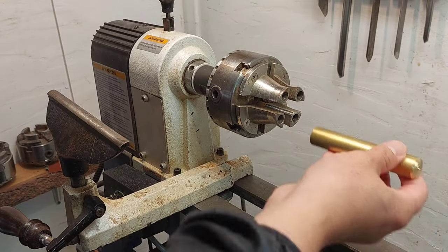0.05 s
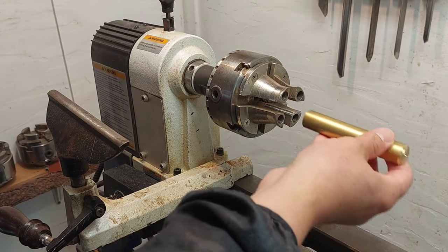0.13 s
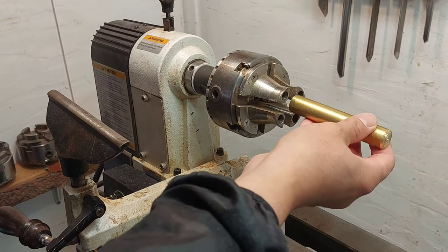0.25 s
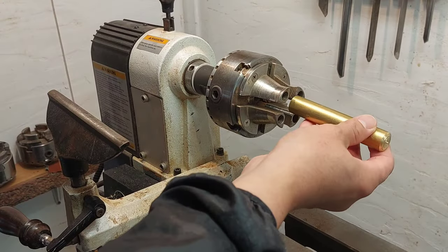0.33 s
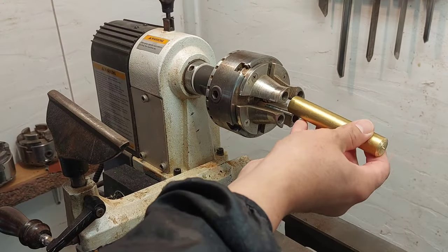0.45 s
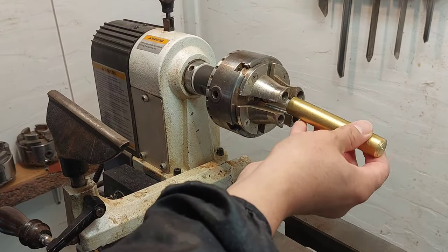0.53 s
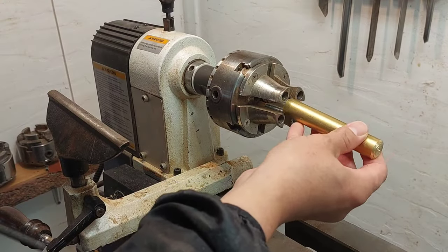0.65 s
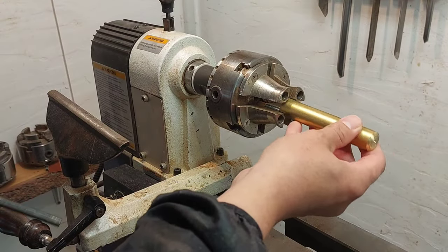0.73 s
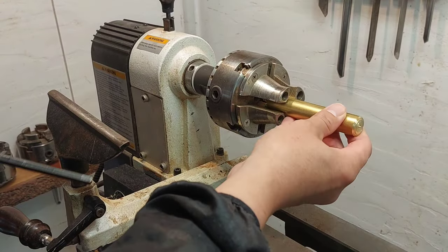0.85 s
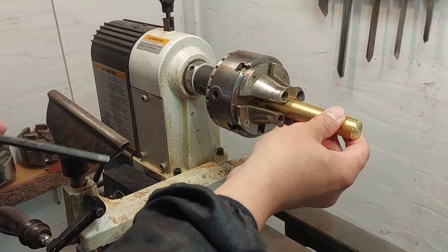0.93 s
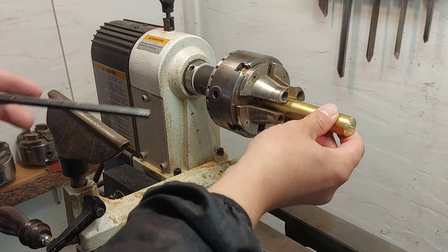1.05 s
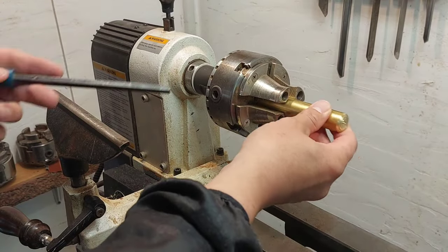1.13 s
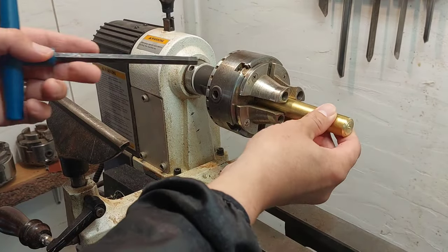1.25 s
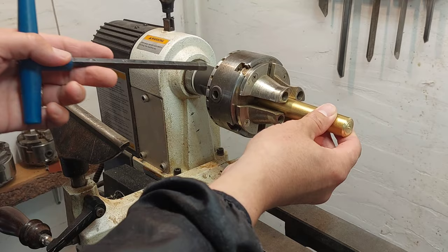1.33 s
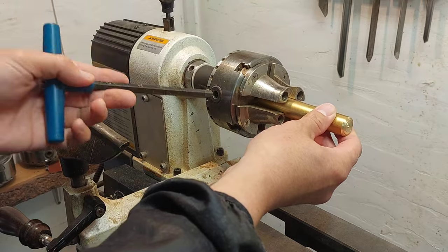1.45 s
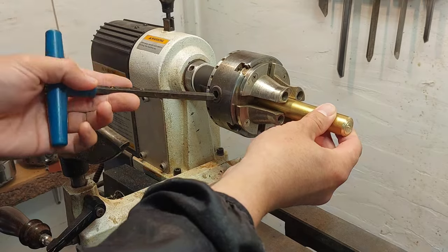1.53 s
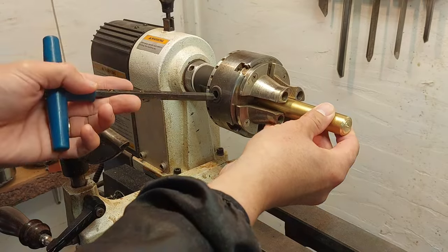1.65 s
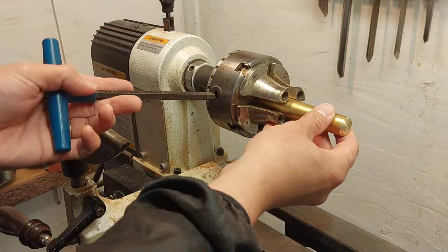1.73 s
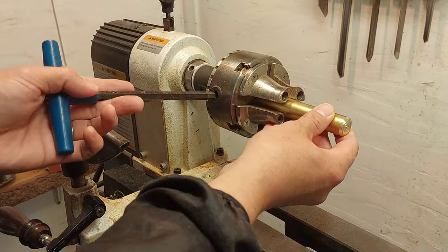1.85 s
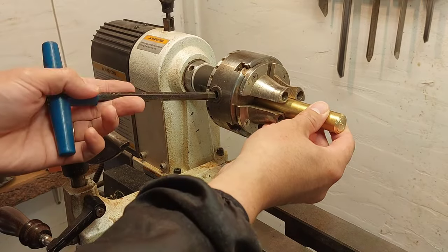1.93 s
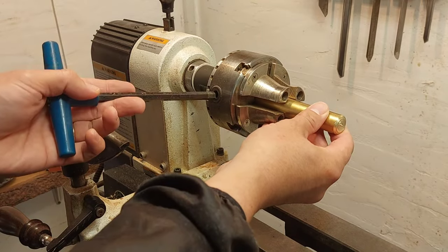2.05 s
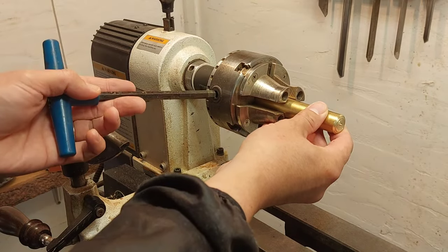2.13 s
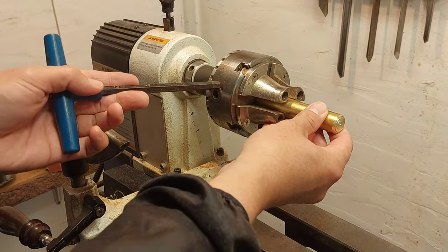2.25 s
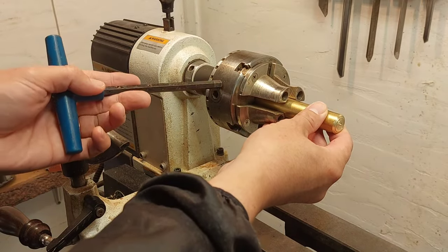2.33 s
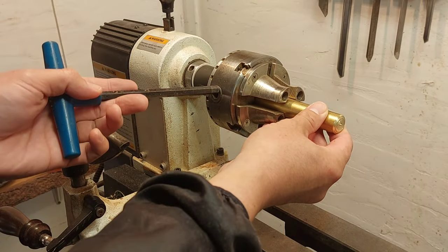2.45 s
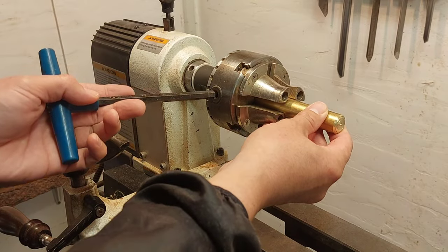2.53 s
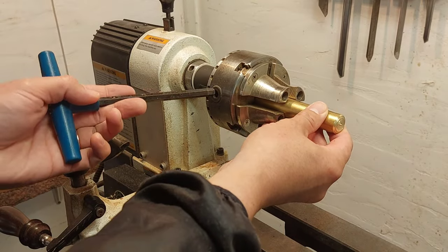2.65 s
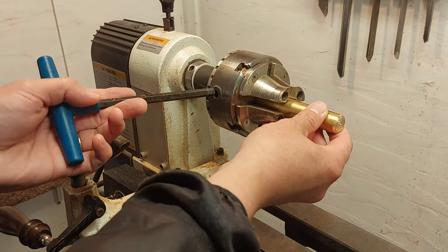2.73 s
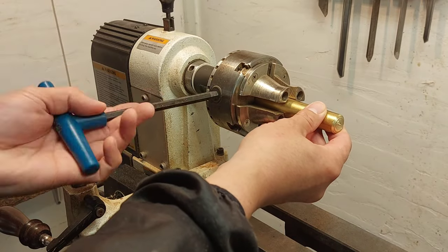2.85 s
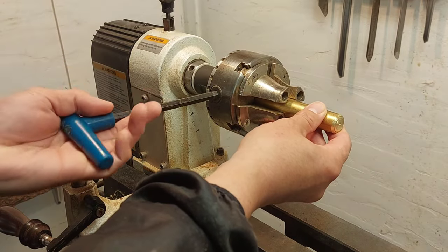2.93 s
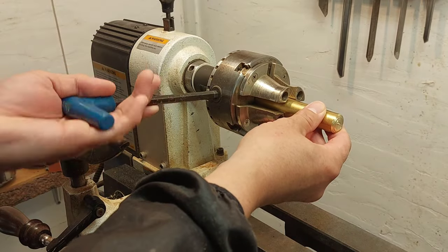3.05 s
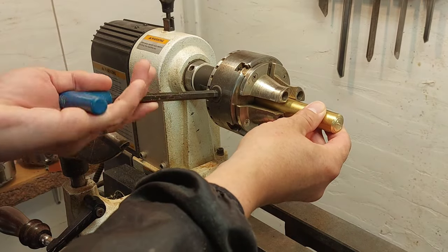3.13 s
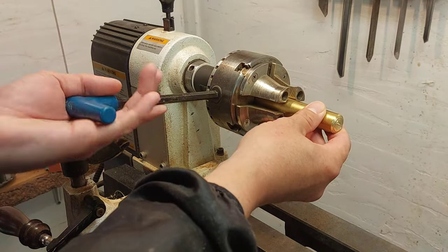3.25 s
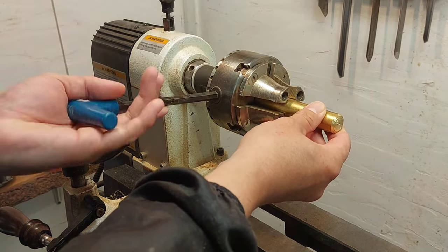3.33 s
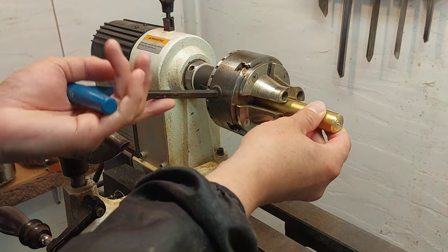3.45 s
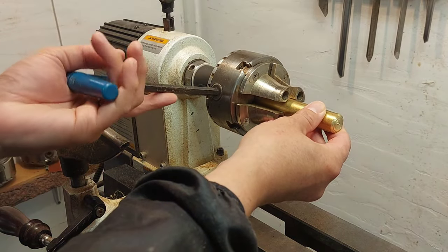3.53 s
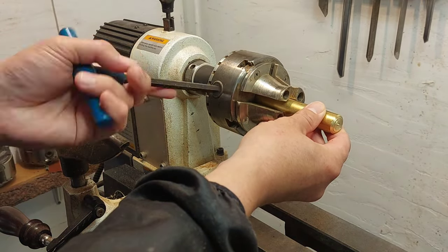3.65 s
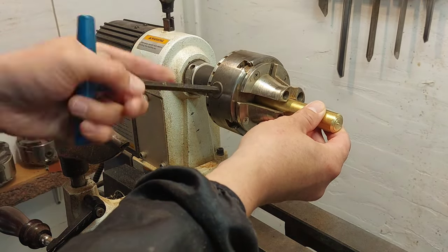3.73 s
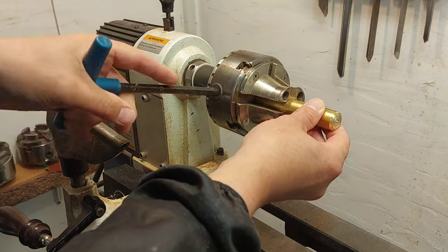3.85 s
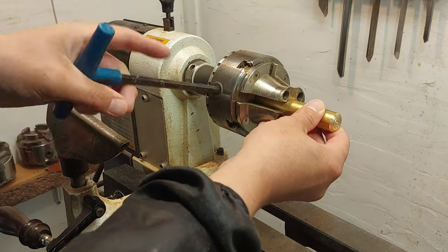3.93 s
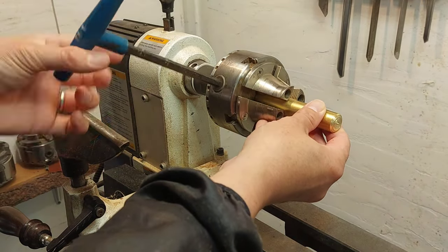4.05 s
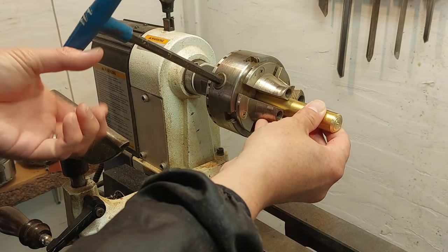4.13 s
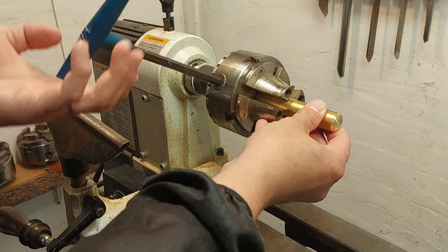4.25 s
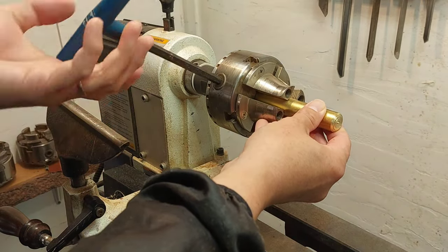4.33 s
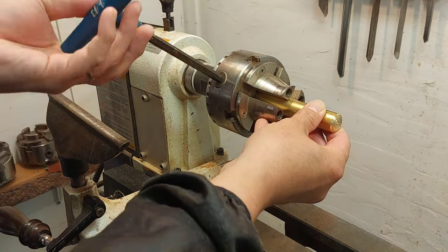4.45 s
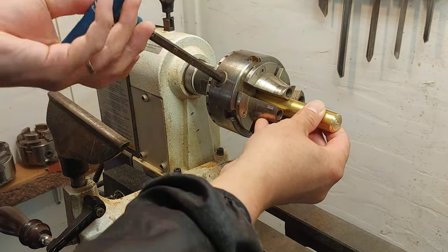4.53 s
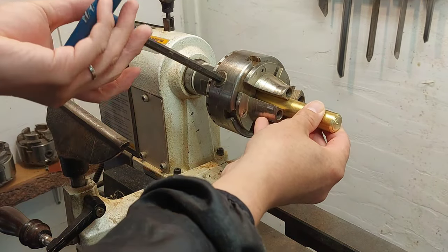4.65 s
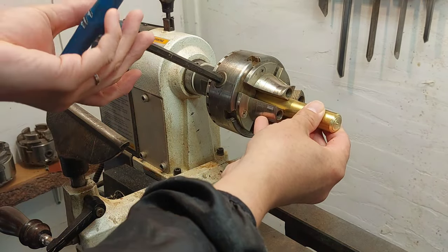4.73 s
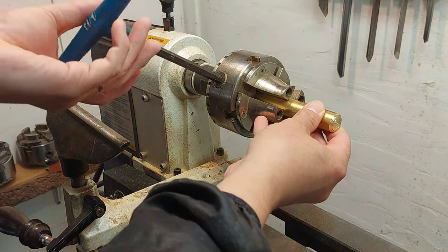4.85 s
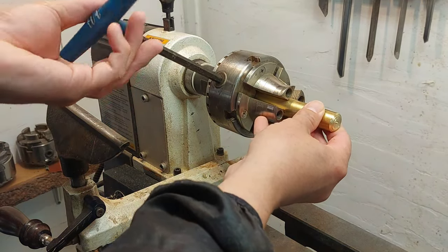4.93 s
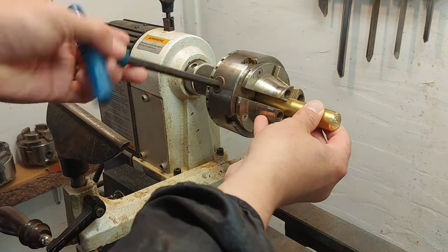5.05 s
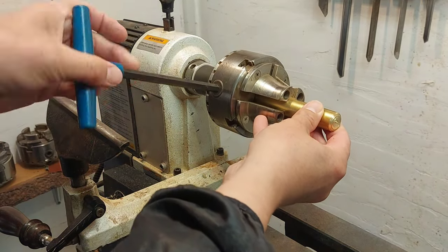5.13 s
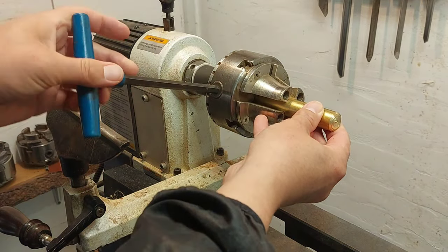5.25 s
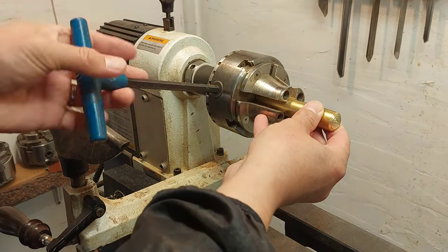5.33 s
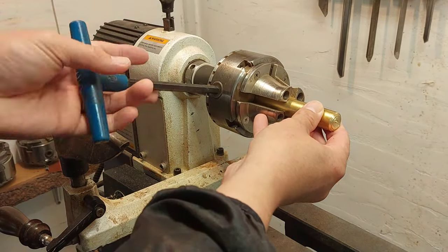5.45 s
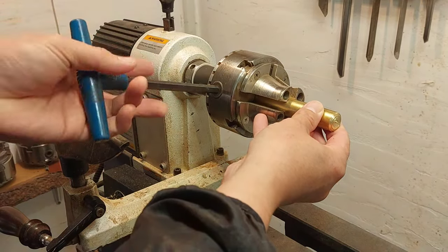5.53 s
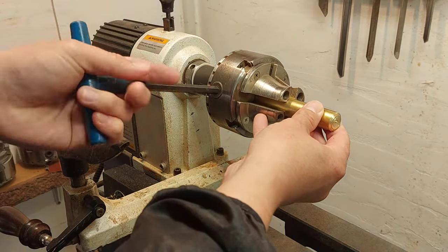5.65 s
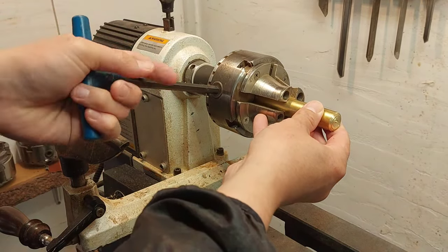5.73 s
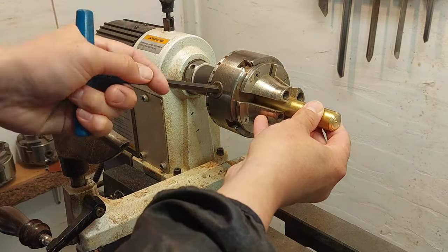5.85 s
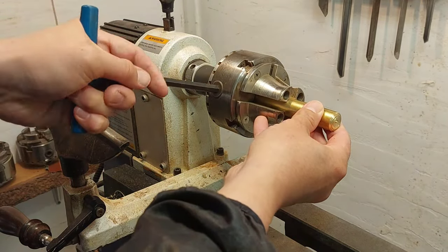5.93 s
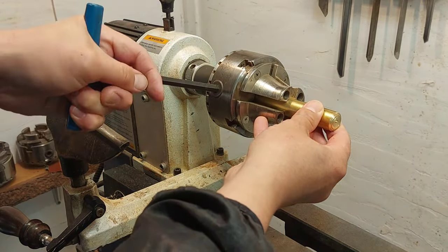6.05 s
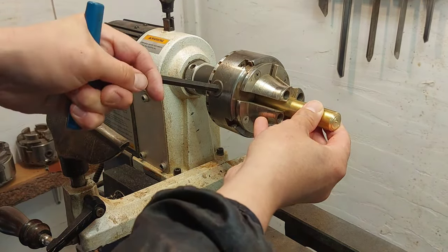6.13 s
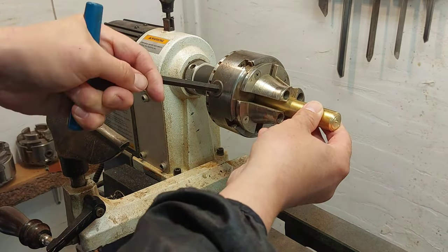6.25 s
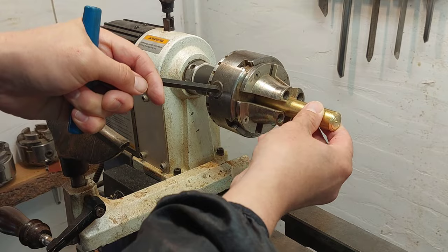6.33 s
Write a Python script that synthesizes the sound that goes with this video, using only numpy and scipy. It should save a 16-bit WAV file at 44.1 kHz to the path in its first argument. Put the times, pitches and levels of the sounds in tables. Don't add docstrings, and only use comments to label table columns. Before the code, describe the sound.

Close up in a small hard-walled workshop, a nylon sleeve swishes as a brass bar knocks on steel jaws, clanks loudly, scrapes and seats with a bright short ring. More scraping knocks follow, then a key clicks into its socket. After a near-quiet pause it drops with a very sharp double snap, then ticks and bounces lightly among soft cloth and skin rubs.

```python
import sys
import numpy as np
from scipy import signal
from scipy.fft import rfft, irfft, next_fast_len
from scipy.io import wavfile
from scipy.ndimage import uniform_filter1d, map_coordinates

SR = 44100
rng = np.random.default_rng(int(sys.argv[2]) if len(sys.argv) > 2 else 0)


def boost(x):
    u = np.asarray(x, float) / 20
    return 10 ** u


def to_wav(sig):
    pcm = np.clip(np.atleast_2d(sig), -1, 1) * 32767
    pcm = np.round(pcm).astype(np.int16)
    wavfile.write(sys.argv[1], SR, pcm.T)


N = 281604
TOP_HZ = 15650


def unit(x):
    return x / np.sqrt(np.mean(x ** 2) + 1e-20)


def along(points, hz):
    f, v = np.transpose(points)
    return np.interp(np.log(hz + 1), np.log(f + 1), v)


def wobble(rate):
    knots = rng.standard_normal(int(N * rate / SR) + 4)
    return map_coordinates(knots, [np.arange(N) * rate / SR])


def filtered(x, response):
    m = next_fast_len(x.shape[-1] + 8192)
    spectrum = rfft(x, m) * response(np.fft.rfftfreq(m, 1 / SR))
    return irfft(spectrum, m)[..., :x.shape[-1]]


def peaks(modes):
    def response(f):
        total = 0
        for k, (c, w, db) in enumerate(modes):
            total = total + (-1) ** k * boost(db) * 1j * f * w / (c * c - f * f + 1j * f * w)
        return total
    return response


def colour(spectrum):
    def gain(hz):
        return unit(boost(along(spectrum, hz)) * np.minimum(1, hz / spectrum[0][0]) ** 2)
    return gain


def swells(rows, column_order, sharper):
    edge_db = 14
    t, power = np.arange(0, N + 64, 64) / SR, 1e-14
    for row in rows:
        u = (t - row[0]) / np.where(t < row[0], abs(row[1]), abs(row[2]))
        power = power + boost(2 * (row[column_order] - sharper * edge_db * u ** 2))
    return np.interp(np.arange(N) / SR, t, np.sqrt(power))


# [pitch_hz, likeness (1 = same)]
NOISE_ALIKE = [(60, 1), (180, 0.64), (550, 0.64), (1650, -0.26), (4970, 0.16), (15000, -0.16)]
# [pitch_hz, left_over_right_db]
NOISE_LEAN = [(60, 7), (180, 7), (550, 3.5), (1650, 3.5), (4970, 5.5), (15000, 2.0)]


def rush(gain, patchy_db):
    z = signal.stft(rng.standard_normal((2, N + 512)), nperseg=512)[2]
    field = uniform_filter1d(rng.standard_normal(z.shape[1:]), size=6, axis=0)
    field = uniform_filter1d(field, size=8, axis=1)
    pair = signal.istft(z * boost(patchy_db * unit(field)), nperseg=512)[1][:, :N]

    def spread(hz):
        turn = np.arccos(np.clip(along(NOISE_ALIKE, hz), -1, 1)) / 2
        return gain(hz) * np.array([np.cos(turn), np.sin(turn)])

    def lean(hz):
        return boost(np.outer([.5, -.5], along(NOISE_LEAN, hz)))

    mid, side = filtered(pair, spread)
    return unit(filtered(np.array([mid + side, mid - side]), lean))


# [pitch_hz, time_to_fall_60db_s]
WALL_DECAY = [(200, 0.67), (1000, 0.3), (5000, 0.19), (14000, 0.16)]
# [pitch_hz, likeness (1 = same)]
WALL_ALIKE = [(300, 1), (800, 0.33), (2000, 0.036)]


def tail(length):
    hz, t, z = signal.stft(rng.standard_normal((2, length)), SR, nperseg=256)
    share = np.clip(along(WALL_ALIKE, hz), 0, 1)[:, None]
    z[1] = share * z[0] + np.sqrt(1 - share ** 2) * z[1]
    fade = boost(-60 * t / along(WALL_DECAY, hz)[:, None])
    pair = signal.istft(z * fade, SR, nperseg=256)[1]
    pair = pair / np.linalg.norm(pair[0])
    return np.pad(pair, ((0, 0), (130, 0))) * boost([[1.5], [-1.5]])


def ring(modes, t, attack, rough):
    luck = rng.normal(size=len(modes))
    drift = rough * np.cumsum(rng.standard_normal((len(modes), len(t))), axis=1) / np.sqrt(SR)
    total = 0
    for (hz, db, t60), u, d in zip(modes, luck, drift):
        fade = np.exp(-np.log(1000) * t / t60)
        total = total + boost(db + 0.84 * u) * fade * np.sin(np.float32(2 * np.pi * hz * t + d))
    return total * (1 - np.exp(-t / attack))


def pings(rows, loose, wet_db, pan_db):
    out, t = np.zeros((2, N + SR)), np.arange(SR // 6) / SR
    for s, db, hz, t60 in rows:
        tone = ring([(hz, db, abs(t60))], t, attack=.0006, rough=loose)
        heard = boost(wet_db) * signal.fftconvolve(tone[None], tail(SR // 6), axes=1)
        heard[:, :len(t)] += tone * boost([[pan_db / 2], [-pan_db / 2]])
        out[:, round(s * SR):][:, :heard.shape[1]] += heard
    return out[:, :N]


# [pitch_hz, time_to_fall_60db_s]
FRAME = [(125, .2), (216, .2), (258, .24), (293, .16), (432, .36), (448, .22), (488, .11), (533, .12),
         (590, .1), (628, .12), (747, .18), (900, .12)]
SPOTS = {"tip": [-9, -5.5, 0.5, -15, -39.5, -9, -3, 3, -2.5, -8.5, -16, -6.5], "mouth": [-14.5, -13.5, -4,
         0, -15.5, 1.5, -9, 0, -13.5, -5, -5.5, -8], "face": [-6.5, -4.5, -4.5, -16, -2.5, -7.5, -14.5, 2,
         -7, -4, -6.5, -7.5], "seat": [-15.5, -17, -1, -8, -13, -18, -24, -9, -9.5, -15.5, -15, -10.5]}
# [pitch_hz, level_db per Hz]
DULL = [(350, -29), (600, -10.5), (792, -7), (899, -10), (1460, -5), (2240, -10), (4000, -16), (5200, -59),
        (8800, -120)]


def strikes(hits, modes, spot, crack, wet_db, pan_db, lead_order, loose=8):
    out, t = np.zeros((2, N + SR)), np.arange(SR // 3) / SR
    frame = [(hz, db, t60) for (hz, t60), db in zip(FRAME, SPOTS[spot])]
    edge = boost(5 - 60 * t / .002) + boost(-2 - 60 * t / .009) + boost(-14 - 60 * t / .04)
    edge = edge * (1 - np.exp(-t / .0002))
    swell = boost(-60 * t / 0.064) * (1 - np.exp(-t / 0.0086))
    late = np.maximum(t - .003, 0)
    crack_gain, dull_gain = colour(crack), colour(DULL)
    for s, db, dull_db, thud_db, ring_db in hits:
        bright = filtered(rng.standard_normal(len(t)), crack_gain)
        dull = filtered(rng.standard_normal(len(t)), dull_gain)
        tone = boost(ring_db) * ring(modes, t, attack=.0003, rough=loose)
        tone = tone + boost(thud_db - 5) * ring(frame, late, attack=.002, rough=8.9)
        near = bright * edge + boost(dull_db) * dull * swell + tone
        walls = tail(SR // 4)
        heard = boost(-7.5) * signal.fftconvolve(tone[None], walls, axes=1)

        def blow(hz):
            dull_size = boost(dull_db) * np.linalg.norm(swell)
            return np.hypot(np.linalg.norm(edge) * crack_gain(hz), dull_size * dull_gain(hz))

        heard[:, :walls.shape[1]] += filtered(walls, blow)
        heard *= boost(wet_db)
        heard[0, :len(t)] += near * boost(pan_db / 2)
        heard[1, lead_order:][:len(t)] += near * boost(-pan_db / 2)
        out[:, round(s * SR):][:, :heard.shape[1]] += boost(db) * heard
    return out[:, :N]


# [pitch_hz, level_db per Hz]
AIR = [(12, -42.5), (20, -10), (114, 4), (192, -14.5), (315, -5), (369, -7), (433, -8), (595, -22.5),
       (687, -11), (780, -22.5), (900, -26), (1170, -60), (1980, -120)]
# [pitch_hz, level_db per Hz]
HISS = [(410, -20), (700, -0.5), (777, 0.5), (1500, -2), (2810, -17), (3550, -29), (3840, -22),
        (8040, -20.5), (9900, -32.5), (15600, -18)]


def still_room():
    def still(hz):
        hiss = boost(along(HISS, hz) - 21.0) * (hz > 600) * (hz < TOP_HZ)
        return np.hypot(boost(along(AIR, hz)), hiss)
    return boost(-70.5) * rush(still, patchy_db=0.1)


# [time_s, level_db]
GRIP = [(0.0, -63.5), (0.39, -68.5), (0.75, -61), (0.84, -70), (1.32, -53.5), (1.42, -58), (1.69, -69),
        (2.06, -60.5), (2.86, -71.5), (3.25, -62), (3.75, -68), (4.0, -62), (4.859, -66), (5.49, -63),
        (5.69, -69), (6.38, -69)]
# [pitch_hz, width_hz, level_db]
HUM = [(113.7, 12, 2.5), (237, 41, -6.5), (318, 14, 0), (434.2, 30, 1), (562, 94, -13), (678, 26, -10.5)]


def frame_hum(skin):
    grip_db = np.interp(np.arange(N) / SR, *np.transpose(GRIP))
    effort = np.hypot(boost(grip_db + 2.5 + 0.83 * wobble(9)), boost(-4) * skin)
    frame_notes = peaks(HUM)
    return effort * rush(lambda hz: frame_notes(hz) * np.minimum(1, hz / 170) ** 2, patchy_db=-3.0)


# [pitch_hz, level_db per Hz]
SWISH = [(1180, -26.5), (2000, -3.5), (2380, -7), (3400, -8.5), (7440, -2), (8480, -1.5), (9490, -9.5),
         (11300, -4), (15600, -1.5), (16000, -12.5)]


def sleeve_swish(cloth, crinkle):
    def nylon(hz):
        return boost(along(SWISH, hz) - 50 * (hz > TOP_HZ))
    return cloth * boost(0.6 + 0.57 * crinkle) * rush(nylon, patchy_db=0.5)


# [pitch_hz, level_db per Hz]
RUB = [(350, -23), (600, 1), (769, -9), (886, -8), (1050, -8), (1460, -1.5), (2130, -9), (2620, -3),
       (5000, -15), (6500, -26.5), (11000, -120)]


def skin_rub(skin, crinkle):
    return skin * boost(-1.54 + 0.37 * crinkle) * rush(lambda hz: boost(along(RUB, hz)), patchy_db=3.0)


# [peak_s, rise_s, fall_s, sleeve_db, skin_db]
BAR_ARM = [
    (.02, 0.13, 0.12, -50.5, -57),
    (.2, 0.18, 0.09, -52.5, -61),
    (.4, 0.025, 0.19, -59, -72.5),
    (.6, 0.13, 0.11, -70, -92),
    (.69, 0.079, 0.12, -66.5, -76),
    (.96, 0.22, 0.071, -62.5, -49),
    (1.29, 0.3, 0.33, -54, -57.5),
    (1.385, 0.066, 0.079, -55, -51),
    (1.56, 0.3, 0.22, -59.5, -67),
]
# [peak_s, rise_s, fall_s, sleeve_db, skin_db]
KEY_ARM = [(1.82, 0.15, 0.19, -70.5, -81), (2.06, .1, 0.061, -77.5, -84), (2.45, 0.066, 0.087, -69.5, -69),
           (2.599, 0.068, 0.035, -76.5, -73.5), (2.76, 0.14, 0.13, -76, -81),
           (3.0, 0.033, 0.17, -62, -71.5), (3.169, 0.19, 0.14, -57, -63.5),
           (3.43, 0.06, 0.098, -58.5, -68.5), (3.6, 0.17, 0.19, -68, -80),
           (3.77, 0.05, 0.076, -63.5, -64.5), (3.954, 0.1, 0.056, -59, -53),
           (4.16, 0.27, 0.076, -67.5, -78), (4.28, 0.14, 0.061, -61, -66), (4.48, 0.15, 0.14, -59.5, -61.5),
           (4.72, 0.13, 0.18, -63.5, -70.5), (4.94, 0.19, 0.2, -63.5, -68.5), (5.1, 0.16, 0.152, -65, -68),
           (5.24, 0.077, 0.068, -60.5, -54.5), (5.46, 0.037, 0.1, -73, -66.5),
           (5.61, 0.029, 0.09, -74, -67), (5.79, 0.37, 0.14, -69.5, -75.5), (5.901, 0.066, 0.16, -78, -79),
           (6.12, 0.076, 0.073, -76, -79), (6.279, 0.2, 0.23, -96.5, -87.5)]


def background():
    moves = BAR_ARM + KEY_ARM
    cloth = np.hypot(swells(moves, column_order=3, sharper=0.88), boost(-78.5))
    skin = swells(moves, column_order=4, sharper=1)
    crinkle = wobble(34)
    return sleeve_swish(cloth, crinkle) + skin_rub(skin, crinkle) + frame_hum(skin) + still_room()


# [start_s, level_db, pitch_hz, time_to_fall_60db_s]
THUMPS = [
    (0.857, -34, 116.3, 0.16),
    (1.399, -34, 114.3, 0.11),
    (4.191, -33.5, 99, 0.058),
    (5.476, -41, 126.3, 0.26),
    (5.525, -42.5, 117.7, 0.23),
]


def thumps():
    out, t = np.zeros(N + SR), np.arange(SR // 3) / SR
    for s, db, hz, t60 in THUMPS:
        modes = [(hz, 0, t60), (1.3 * hz, -4, t60), (1.8 * hz, -6, t60), (2.4 * hz, -8, t60)]
        out[round(s * SR):][:len(t)] += boost(db) * ring(modes, t, attack=0.022, rough=1.1)
    return out[:N] * boost([[2.5], [-2.5]])


# [start_s, level_db, pitch_hz, time_to_fall_60db_s]
FRAME_PINGS = [
    (.389, -30, 525, 0.059),
    (.405, -37, 494, 0.18),
    (.668, -49, 559, 0.17),
    (.7, -48.5, 500, .12),
    (.7105, -50, 540, 0.073),
    (.7515, -30.5, 524, 0.061),
    (1.133, -38, 432, 0.45),
    (1.309, -40, 463, 0.14),
    (1.648, -45, 454.6, 0.38),
]
# [start_s, level_db, pitch_hz, time_to_fall_60db_s]
BODY_PINGS = [
    (1.129, -32.5, 2304, .17),
    (1.13, -35, 2393, .13),
    (1.179, -42, 2330, .09),
    (1.178, -47, 4850, .04),
    (3.0143, -23, 13000, .006),
    (3.019, -25, 10200, .006),
    (3.022, -42, 1949, .14),
    (3.024, -44, 1528, .1),
]
# [start_s, level_db, pitch_hz, time_to_fall_60db_s]
LATE_PINGS = [(.392, -51.5, 896, .16), (.39, -46, 1230, .09), (.406, -49, 703, 0.22),
              (1.142, -37.5, 431.2, 0.42), (1.1285, -34.5, 2487, 0.046), (1.13, -45, 7730, .12),
              (1.13, -47.5, 5840, .1), (1.132, -48.5, 2778, .1), (1.181, -44.5, 5130, .02),
              (3.02, -43, 269, .2), (3.022, -46, 1256, 0.17), (3.024, -42, 2977, .1),
              (3.027, -39.5, 3440, 0.035), (3.03, -43.5, 6029, .12), (4.418, -51, 451, .15),
              (4.445, -55, 454, .1), (4.447, -54, 1970, .05), (4.416, -51, 2850, .05), (5.21, -55, 470, .2),
              (5.292, -53.5, 429, .12), (3.497, -53, 900, .15), (2.772, -61, 1450, .15),
              (.838, -42, 3000, .14), (.975, -54, 4680, .2)]


def lingering_notes():
    notes = pings(FRAME_PINGS + BODY_PINGS, loose=2.5, wet_db=-20, pan_db=4)
    notes = notes + pings(LATE_PINGS, loose=6, wet_db=-9, pan_db=4)
    palm_s, palm_width_s, palm_depth = 1.229, .009, .9
    return notes * (1 - palm_depth * np.exp(-((np.arange(N) / SR - palm_s) / palm_width_s) ** 2))


# [pitch_hz, level_db, time_to_fall_60db_s]
KEY = [(5200, -1, .007), (7300, -1.5, .005), (11400, -4, .004)]
# [pitch_hz, level_db per Hz]
CRACK = [(1180, -43.5), (2000, 1.5), (2130, -12.5), (2710, -0.5), (4260, 2.5), (8550, 3), (9250, -5),
         (13200, -5.5), (16000, -6.5)]
KNOCK = [(1180, -28), (2000, -12), (4260, -28), (4690, -1), (8630, -7.5), (9250, -11), (13400, -9.5),
         (16000, -22)]
DROP_CRACK = [(1180, -42.5), (2200, -13.5), (3500, -2), (5200, 3), (8500, 2), (9400, -4.5), (12000, 1.5),
              (15300, -3), (16000, -10)]
# [start_s, crack_db, dull_db, frame_thud_db, ring_db], the last three beside the crack.
KEY_HITS = [(1.6427, -30.5, -15, -25.5, 8.5), (1.7579, -62.5, -25.5, -17.5, -16),
            (2.7698, -48, -9.5, -8, 7.5), (3.4945, -36.5, -8, -15.5, 5.5), (3.7445, -56, -39, -26, -9),
            (4.4152, -45.5, -11, -16, -28), (5.464, -47.5, -15, -6, -21), (5.5926, -50, -35, -13, -18),
            (5.7918, -54, -24, -12, -16), (5.824, -56.5, -7, -28, -6), (6.112, -71, -9.5, -9, -14)]
KEY_TICKS = [
    (2.031, -71, 5, -16.5, -5),
    (2.06, -71, 5, 11, -10),
    (3.0066, -52, -2.5, -23, -10),
    (3.0804, -45.5, 0.5, -19, -1.5),
    (3.4905, -54.5, 0.5, -29, -8.5),
]
KEY_DROP = [
    (3.0141, -17.5, -24, -29, -6),
    (3.0193, -20, -16, -20, -4),
    (3.029, -35, -6, -16, 5),
]
KEY_BOUNCES = [
    (2.4241, -60.5, -28, 2.5, -4),
    (3.8616, -55.5, -15, -3, -17),
    (4.428, -45.5, -5, -4, -14),
    (4.4485, -44, -18, -19, -21),
    (5.184, -52.5, -16.5, -20, -9),
    (5.208, -44.5, -23.5, -24, -2),
    (5.2332, -42, -8, -9.5, -15.5),
]
KEY_CHATTER = [
    (1.6441, -31.5, -17, -44.5, -7),
    (1.6468, -41, -21.5, -28, -2.5),
    (1.652, -36, -5, -15.5, -7.5),
]
KEY_RATTLE = [
    (3.0125, -48, -30, -30.5, -16.5),
    (5.458, -59.5, -11, -12, -16),
    (4.4188, -45, -8, -19, -12),
    (4.4225, -45, -7, -20, -12),
    (4.4535, -54, -10, -11, -12),
    (4.463, -53, -15, -22, -12),
    (5.2385, -49, -16, -11, -12),
]
# [start_s, level_db, pitch_hz, time_to_fall_60db_s]
KEY_PINGS = [(2.03, -70, 1470, .15), (2.035, -74.5, 4700, 0.2), (2.058, -65.5, 1364, 0.25),
             (2.06, -71, 1910, 0.085), (2.424, -57.5, 4830, 0.022), (3.0066, -40, 4900, .015),
             (3.0145, -16.5, 7250, 0.0088), (3.0143, -16, 11100, 0.0062), (3.019, -19, 8360, 0.0088),
             (3.0192, -22, 4940, 0.017), (3.028, -37, 2735, 0.087), (3.0804, -37, 5414, 0.0099),
             (3.745, -56, 4940, 0.018), (3.862, -69, 1390, 0.17), (3.8616, -58, 5100, .02),
             (4.161, -60, 880, 0.12), (4.19, -51, 437, 0.074), (5.078, -62, 2670, .06),
             (5.184, -58, 2660, 0.055), (5.206, -48.5, 2700, 0.064), (5.238, -50.5, 2560, 0.058),
             (5.464, -60, 2620, 0.053), (5.476, -54, 508, 0.54), (5.593, -57.5, 2910, 0.056),
             (5.6, -62, 785, .1), (5.8, -66, 2540, 0.046), (5.83, -64, 2790, 0.088),
             (5.83, -70, 2000, 0.077)]
# [start_s, level_db, pitch_hz, time_to_fall_60db_s]
SHAFT_HUM = [
    (1.7, -67, 2237, .4),
    (1.83, -72, 2138, 0.42),
]


def key_in_socket():
    key = strikes(KEY_HITS, KEY, "face", CRACK, wet_db=4.5, pan_db=17, lead_order=4)
    key = key + strikes(KEY_TICKS, KEY, "face", KNOCK, wet_db=4.5, pan_db=14.5, lead_order=4)
    key = key + strikes(KEY_DROP, KEY, "face", DROP_CRACK, wet_db=0.0, pan_db=7, lead_order=4)
    key = key + strikes(KEY_BOUNCES, KEY, "face", CRACK, wet_db=2.0, pan_db=8.5, lead_order=4)
    key = key + strikes(KEY_CHATTER, KEY, "face", CRACK, wet_db=-7, pan_db=12.5, lead_order=4)
    key = key + strikes(KEY_RATTLE, KEY, "face", CRACK, wet_db=-3, pan_db=9, lead_order=4)
    key = key + pings(KEY_PINGS, loose=12, wet_db=-13, pan_db=5)
    return key + pings(SHAFT_HUM, loose=45, wet_db=-3, pan_db=4)


# [pitch_hz, level_db, time_to_fall_60db_s]
JAW = [(1316, -6, .15), (1868, -9, .1), (3515, -8, .1), (4700, -11, .25), (7068, -8, .1), (7795, -4, .09),
       (11535, -1, .15), (11580, -5, .12), (14710, -7, .11)]
# [pitch_hz, level_db per Hz]
CLANK = [(1180, -42.5), (2000, -8), (3300, -0.5), (7910, 6), (10700, -14.5), (11900, -4.5), (12900, -19.5),
         (15200, -12.5), (16000, -42)]
# [start_s, crack_db, dull_db, frame_thud_db, ring_db]
JAW_HITS = [
    (.8318, -29, -7, -13.5, -27.5),
    (.8352, -16, -13, -19.5, -20),
    (.840, -33, -8, -10, -22),
]
# [pitch_hz, level_db, time_to_fall_60db_s]
SEAT = [(1480, -7.5, .19), (2120, -10, .09), (2251, -6, .11), (1900, -13, .09), (2600, -9, .08),
        (3396, -13, .12), (3870, -15, .12), (4490, -9, .07), (4635, -14, .2), (4824, 0, .12),
        (4897, -9, .09), (7704, -12, .12), (8882, -12, .13), (12476, -10, .28)]
# [pitch_hz, level_db per Hz]
SEAT_CRACK = [(1180, -17), (2300, 0.5), (3400, -3), (5200, 1), (8700, -5), (9400, -16), (13000, -17),
              (16000, -24.5)]
# [start_s, crack_db, dull_db, frame_thud_db, ring_db]
SEAT_HITS = [
    (1.1268, -24, -15, -40, -22),
    (1.1295, -28, -4, -3, 3),
]


def jaws_and_seat():
    jaws = strikes(JAW_HITS, JAW, "face", CLANK, wet_db=-4.5, pan_db=7.0, lead_order=3)
    return jaws + strikes(SEAT_HITS, SEAT, "seat", SEAT_CRACK, wet_db=-1, pan_db=3, lead_order=8, loose=5)


# [pitch_hz, level_db, time_to_fall_60db_s]
BAR = [(1316, -9, .13), (1490, -8, .13), (1910, -12, .12), (2875, -9, .08), (4640, 0, .17), (4700, -4, .12),
       (7590, -14, .1), (11560, -15, .12)]
# [start_s, crack_db, dull_db, frame_thud_db, ring_db]
TIP_HITS = [
    (.3855, -36, 1.2, 3, -12),
    (.4045, -45, 7.1, 9, -17),
]
# [start_s, crack_db, dull_db, frame_thud_db, ring_db]
BAR_HITS = [
    (.4785, -50, 6.5, -8.5, -17),
    (.7505, -38, 4, 8, -10),
    (1.0528, -55.5, 13.5, 4, 7),
    (1.3135, -47.5, 6.5, 6.5, 3.5),
    (1.3681, -45, -7, -0.5, -9),
]
# [start_s, crack_db, dull_db, frame_thud_db, ring_db]
BAR_TOUCHES = [
    (0.669, -63, 11, 8, -18),
    (0.7, -66.5, 14, 19.5, -13.5),
    (0.7105, -57, 8, 8.5, -18),
    (0.764, -47, 8, 5, -3.5),
    (1.268, -49, 6.5, -5, -5),
    (1.342, -64, -3.5, -7, -9.5),
]
# [start_s, level_db, pitch_hz, time_to_fall_60db_s]
BAR_PINGS = [(.3855, -56, 4520, 0.17), (.3875, -55.5, 2890, .1), (.394, -46.5, 1518, .15),
             (.398, -46, 1129, 0.19), (.402, -45.5, 1853, .15), (.4785, -41.5, 2590, 0.028),
             (.4795, -56, 2880, 0.12), (.4785, -55.5, 5300, .05), (.7505, -42, 3000, 0.072),
             (.756, -46.5, 4670, 0.17), (.752, -44, 1270, 0.13), (1.128, -36, 2400, .06),
             (1.13, -42.5, 3920, 0.17), (1.131, -46, 3450, 0.1), (1.1268, -33, 5340, .015),
             (1.271, -52.5, 2580, .1), (1.3145, -40.5, 4673, 0.083), (1.3195, -43, 4687, 0.061),
             (1.343, -49, 4690, 0.068), (1.3686, -40, 4640, .06), (1.372, -46, 3900, 0.072),
             (1.383, -47, 4600, 0.056), (1.4, -52, 4714, 0.097)]


def bar_knocks():
    tip = strikes(TIP_HITS, BAR, "tip", KNOCK, wet_db=2.0, pan_db=7.5, lead_order=3)
    mouth = strikes(BAR_HITS + BAR_TOUCHES, BAR, "mouth", KNOCK, wet_db=1.0, pan_db=4.5, lead_order=3)
    return tip + mouth + pings(BAR_PINGS, loose=17, wet_db=-6, pan_db=3)


# [peak_s, rise_s, fall_s, frame_db, bar_ring_db]
DRAG = [
    (.69, .02, 0.12, -61, -80),
    (.8, .06, .06, -74, -76),
    (.96, 0.072, 0.089, -49.5, -61),
    (1.08, 0.026, 0.12, -75, -75.5),
    (1.27, .06, 0.044, -66, -67.5),
    (1.33, 0.062, 0.016, -47, -80),
    (1.39, 0.055, 0.05, -53.5, -62),
]


def bar_scrape():
    frame_gain = swells(DRAG, column_order=3, sharper=1.0)
    bar_gain = swells(DRAG, column_order=4, sharper=0.79)
    catches = (rng.random((2, N)) < .02) * rng.standard_normal((2, N)) * boost(6.1 * wobble(40))
    catches = catches + .6 * catches[::-1]
    bar_modes = [(hz, 2.2 / t60 + 30, db + 6.0 * (hz < 3000)) for hz, db, t60 in BAR]
    frame_modes = [(hz, 3.7 / t60 + 12, db) for (hz, t60), db in zip(FRAME, SPOTS["mouth"])]
    bar = unit(filtered(catches, peaks(bar_modes)))
    frame = unit(filtered(catches, peaks(frame_modes)))
    return (bar_gain * bar + frame_gain * frame) * boost([[1.5], [-1.5]])


# [pitch_hz, left_over_right_db]
HIT_LEAN = [(150, 0.5), (350, 0), (700, -1), (1400, -3.5), (2800, -3), (5600, 0.8), (10000, -0.4),
            (14000, -6)]


def scene():
    def small_parts(hz):
        no_bass = (1j * hz / (85 + 1j * hz)) ** 2
        lean = boost(np.outer([.5, -.5], along(HIT_LEAN, hz))) * (hz < TOP_HZ + 800)
        return no_bass * boost(-16 * (hz > TOP_HZ + 250)) * lean

    room = background()
    contacts = thumps() + lingering_notes() + key_in_socket()
    contacts = contacts + jaws_and_seat() + bar_knocks() + bar_scrape()
    return filtered(contacts, small_parts) + room


def roll_off(x):
    return signal.sosfilt(signal.butter(12, 16520, fs=SR, output="sos"), x)


def record(dry):
    return roll_off(dry)


dry = scene()
out = record(dry)
to_wav(out)
```